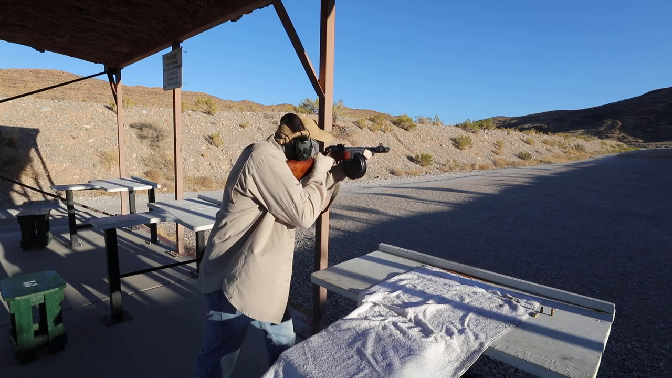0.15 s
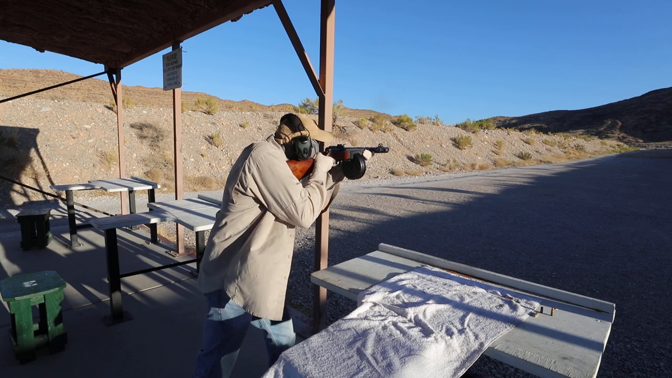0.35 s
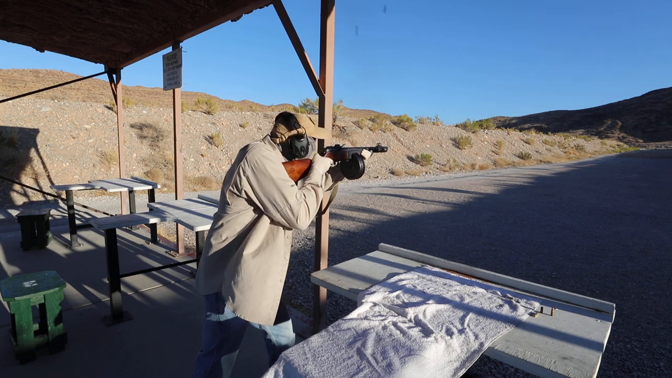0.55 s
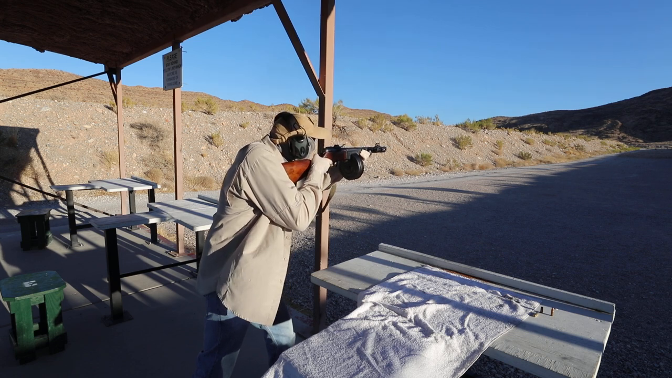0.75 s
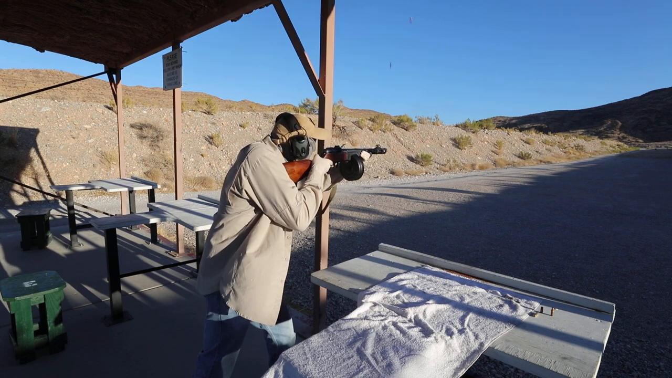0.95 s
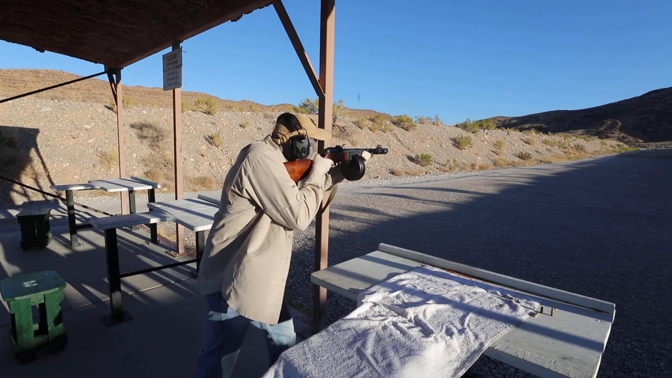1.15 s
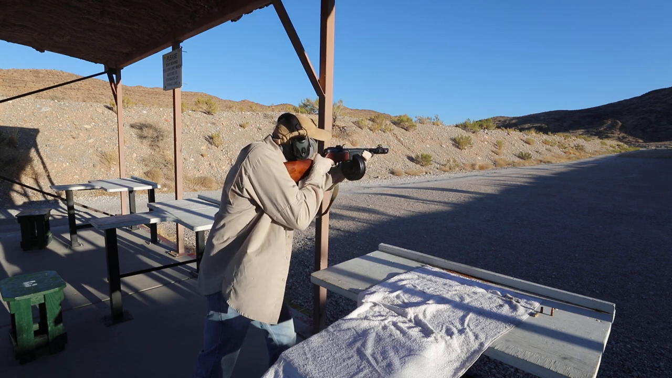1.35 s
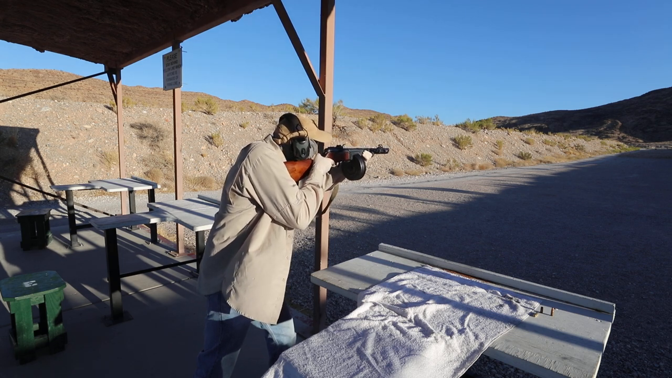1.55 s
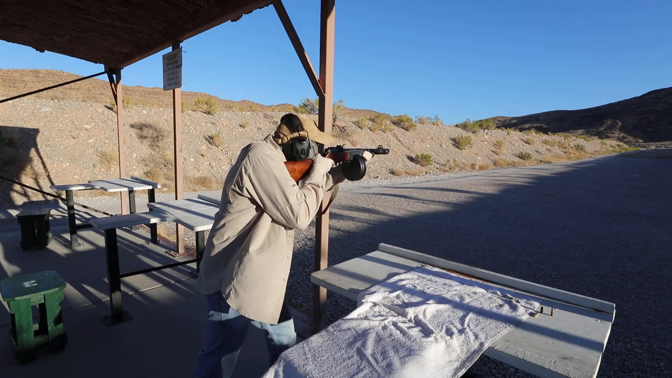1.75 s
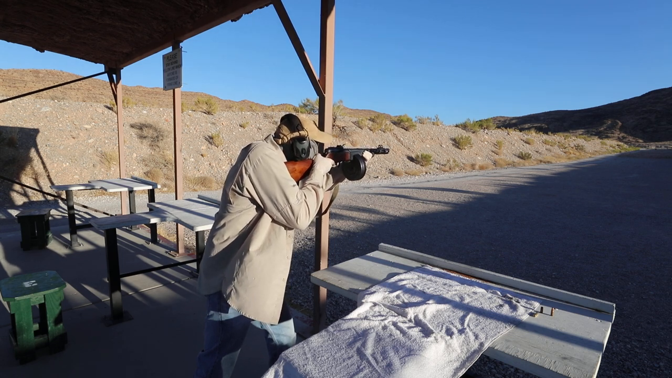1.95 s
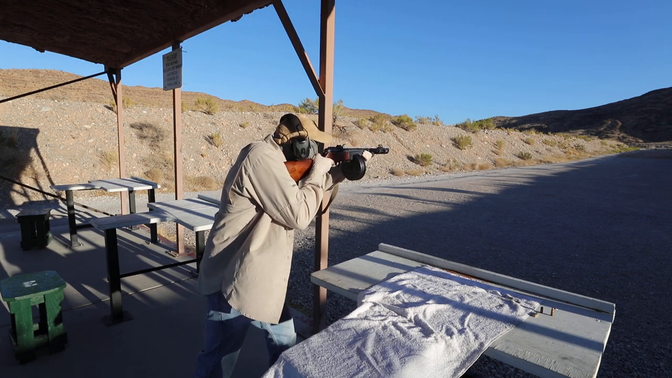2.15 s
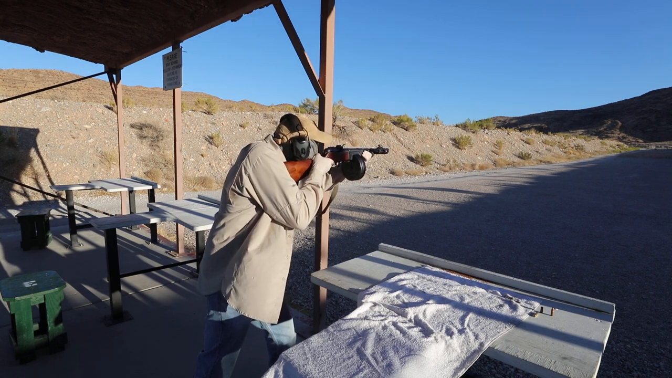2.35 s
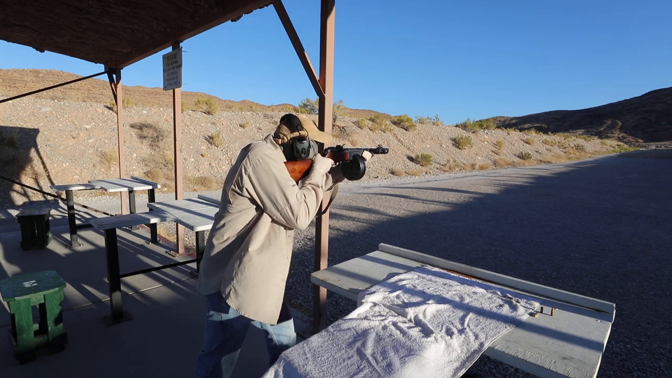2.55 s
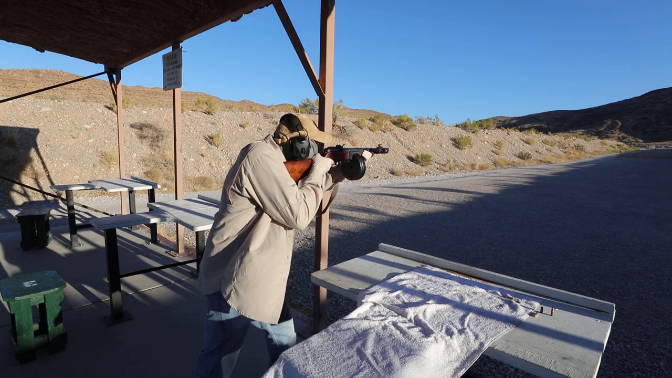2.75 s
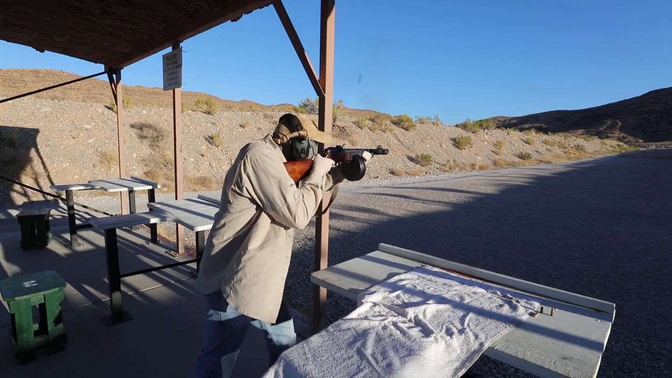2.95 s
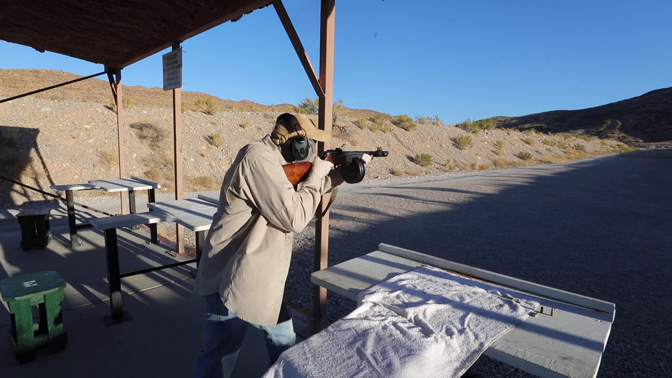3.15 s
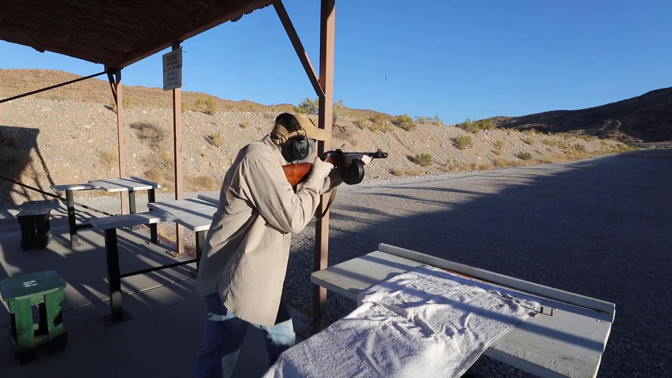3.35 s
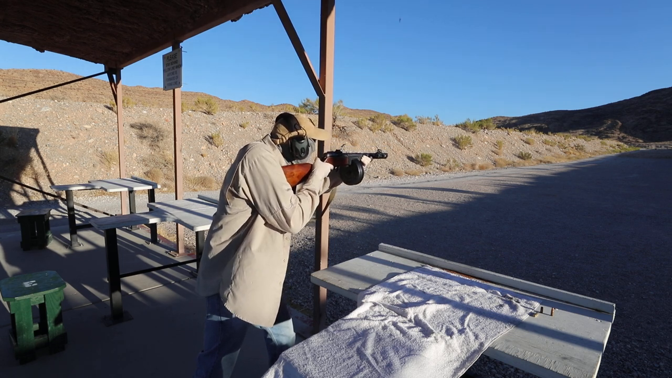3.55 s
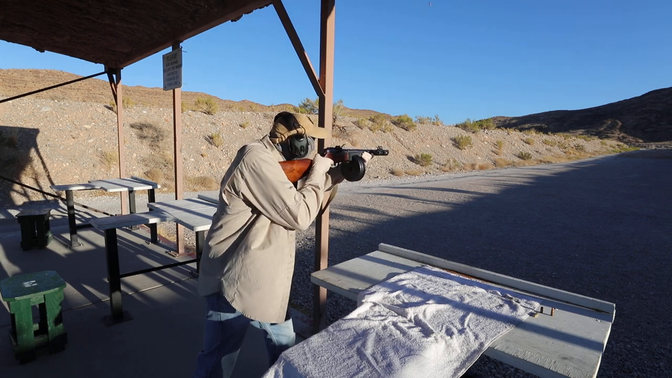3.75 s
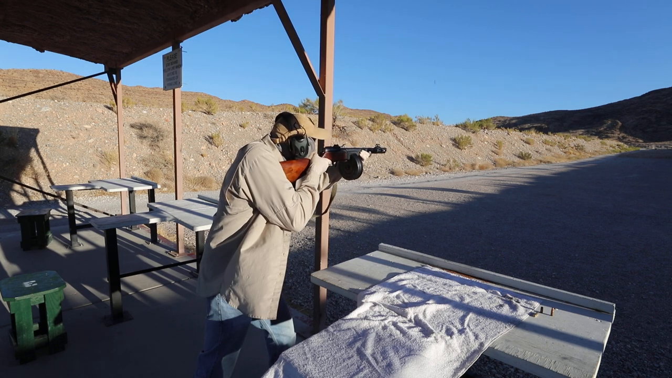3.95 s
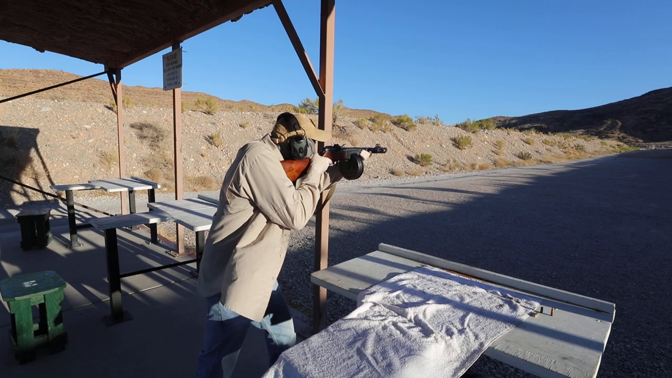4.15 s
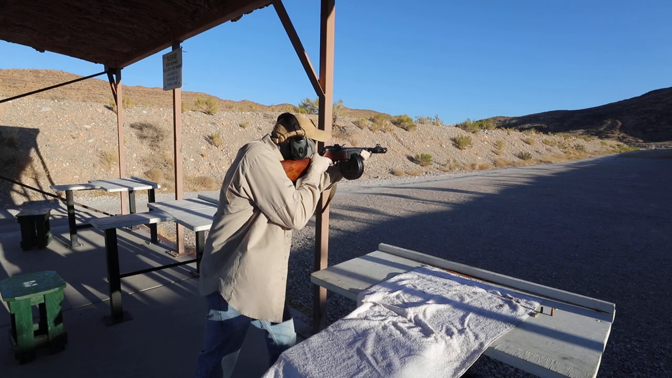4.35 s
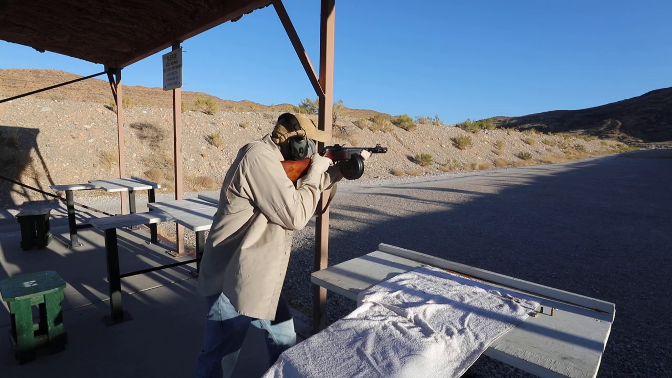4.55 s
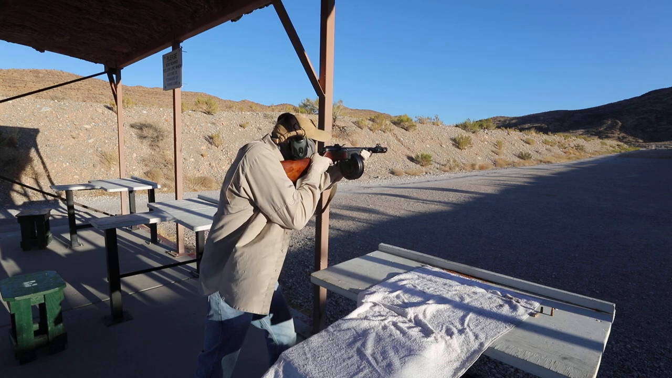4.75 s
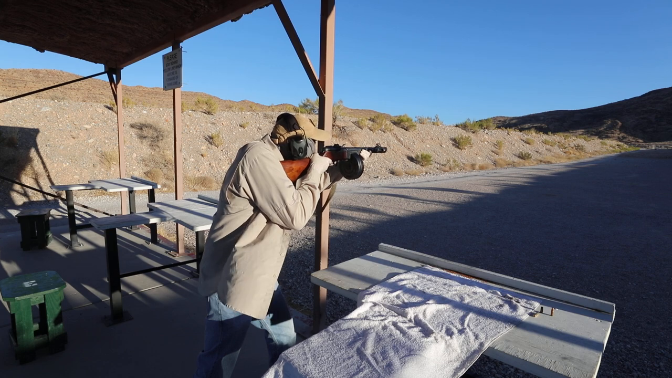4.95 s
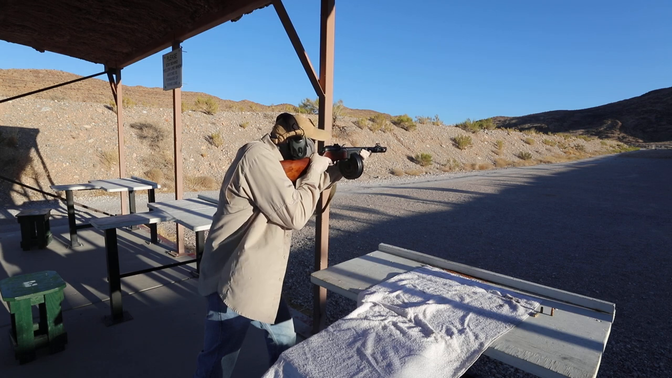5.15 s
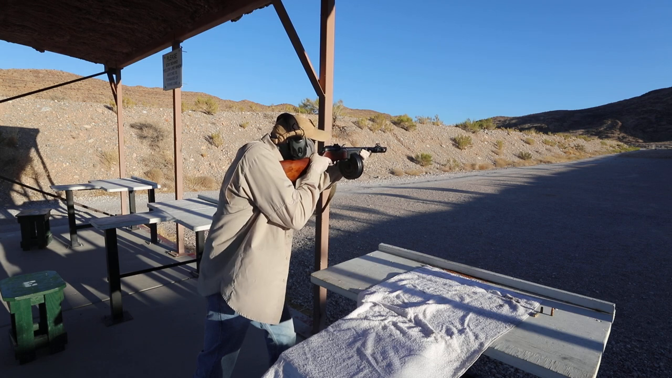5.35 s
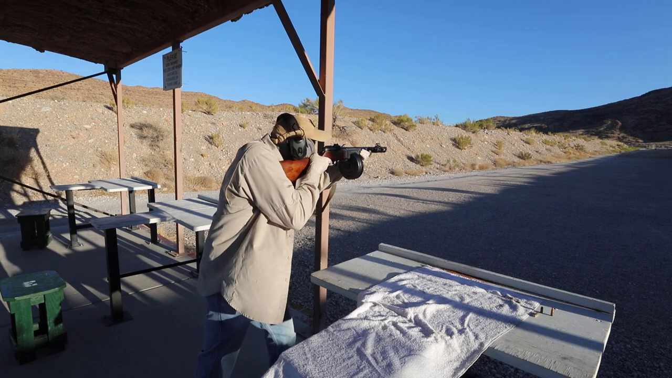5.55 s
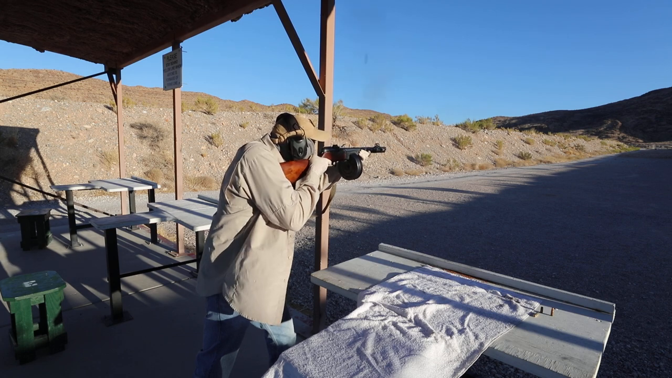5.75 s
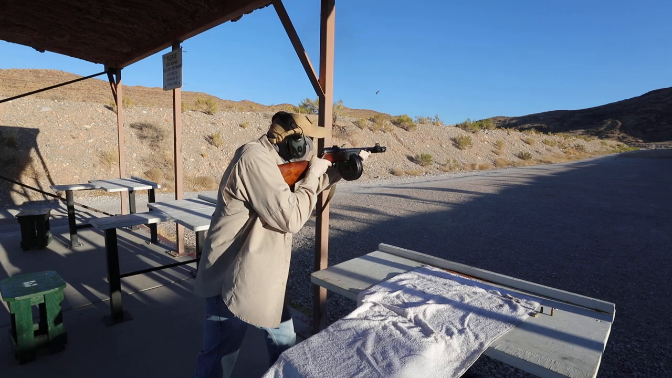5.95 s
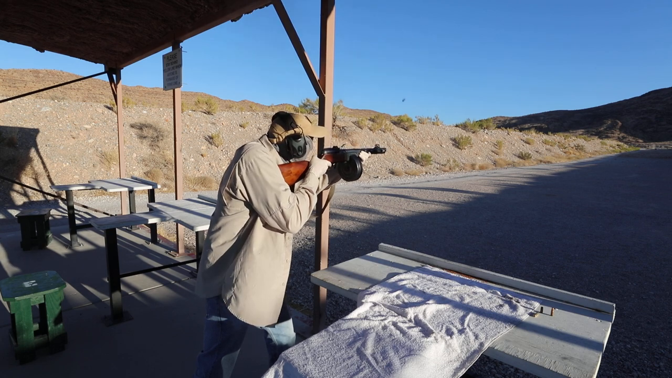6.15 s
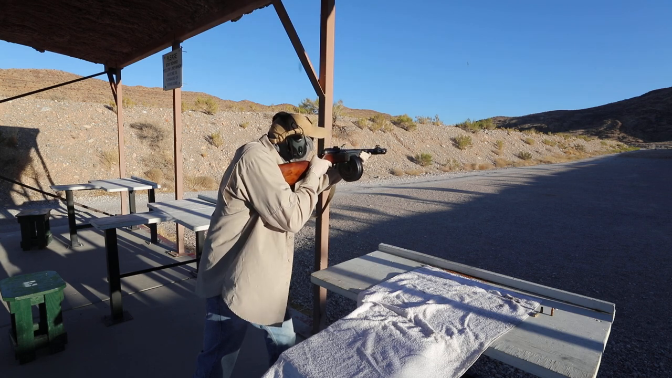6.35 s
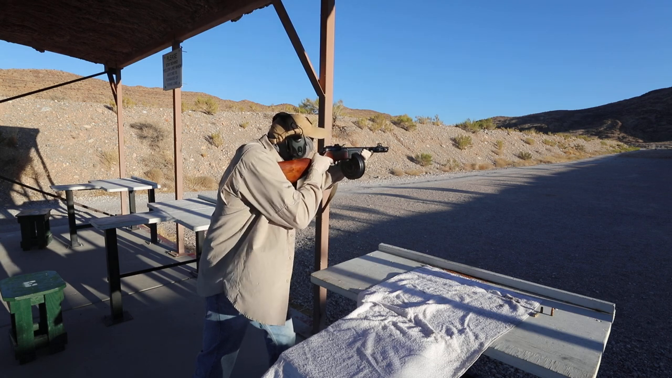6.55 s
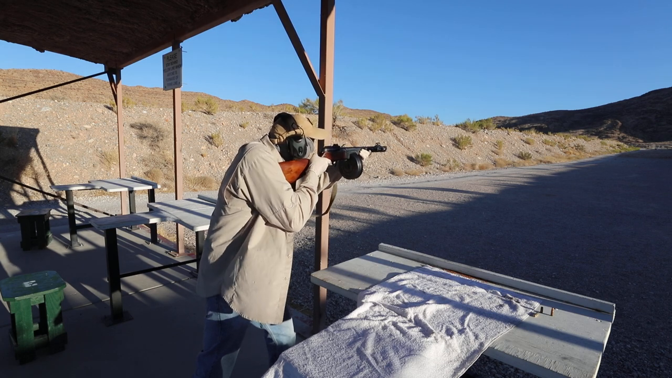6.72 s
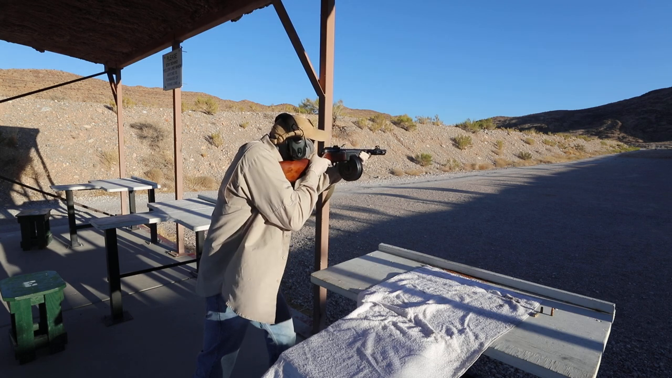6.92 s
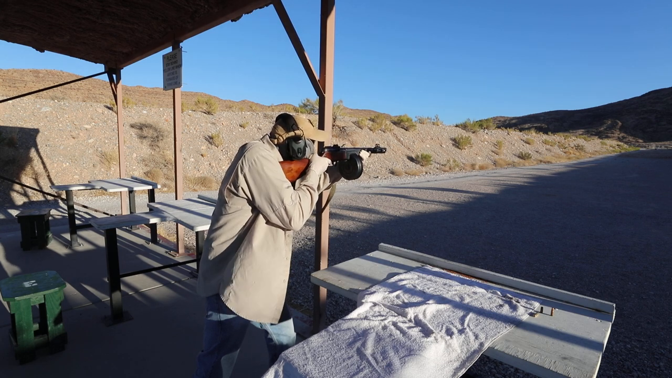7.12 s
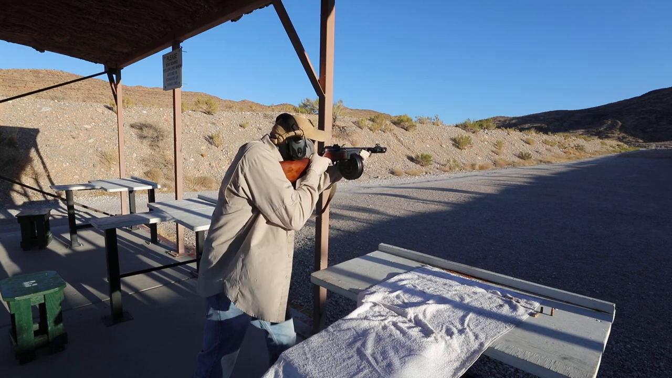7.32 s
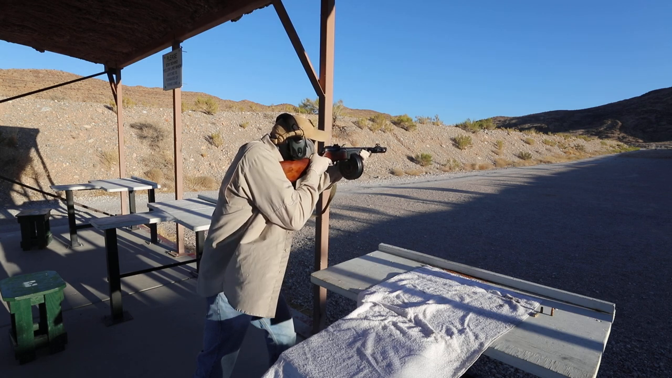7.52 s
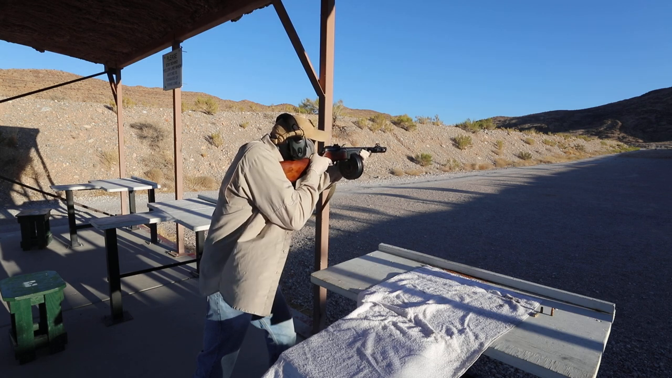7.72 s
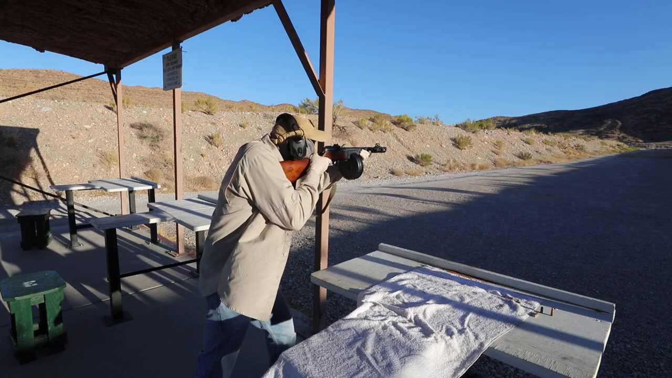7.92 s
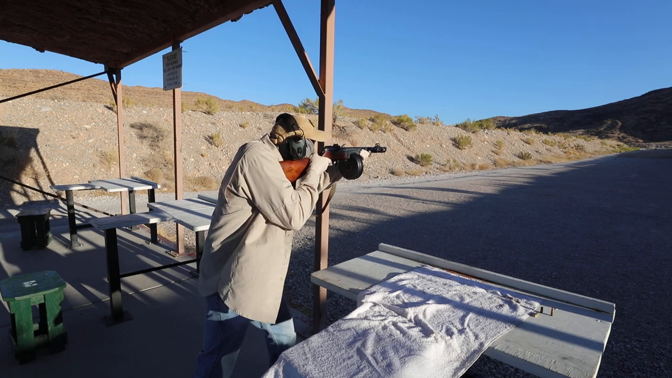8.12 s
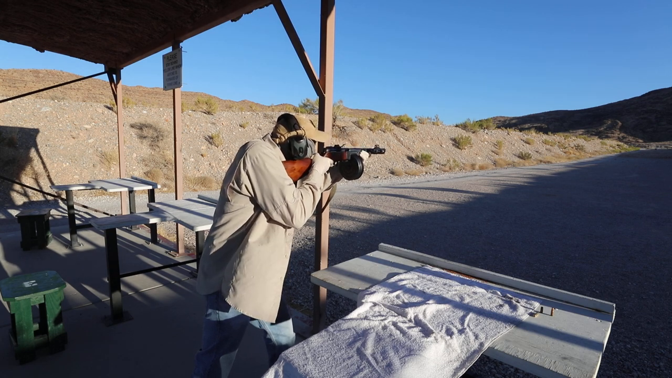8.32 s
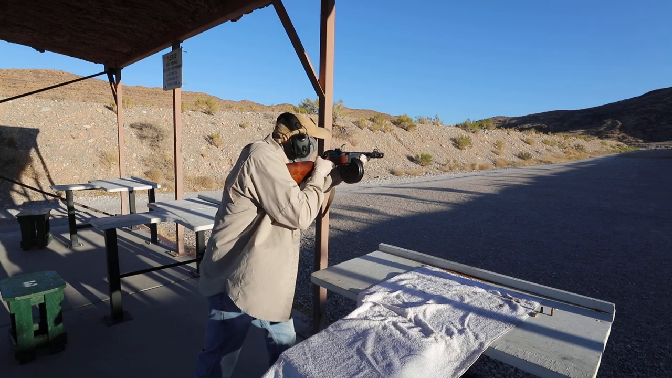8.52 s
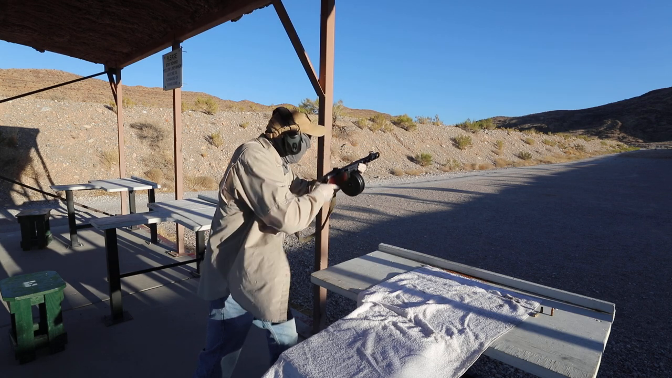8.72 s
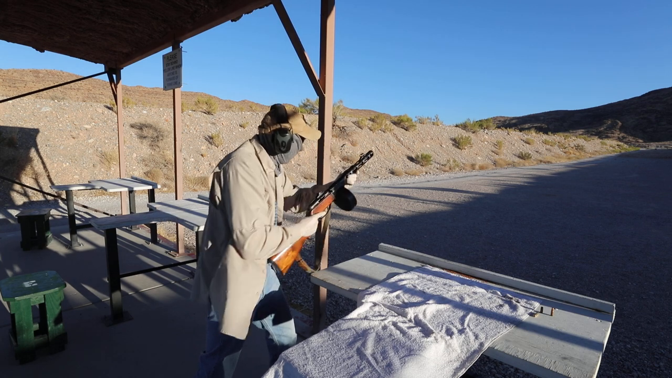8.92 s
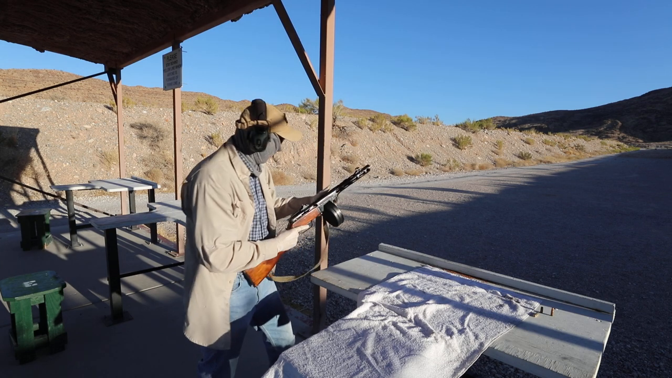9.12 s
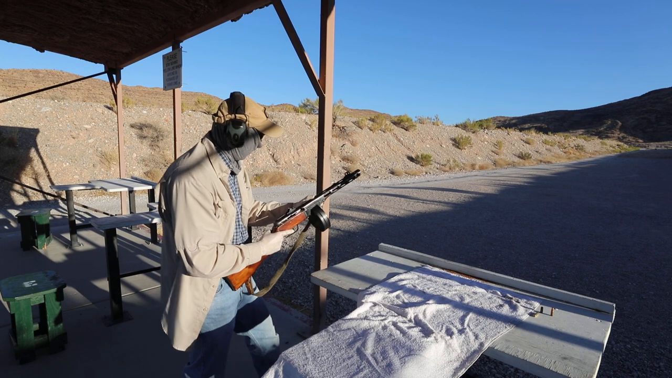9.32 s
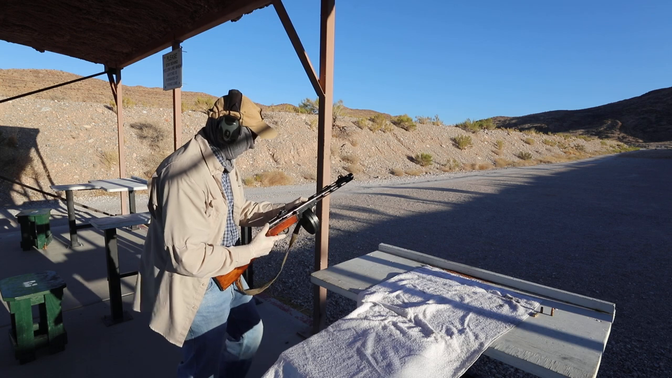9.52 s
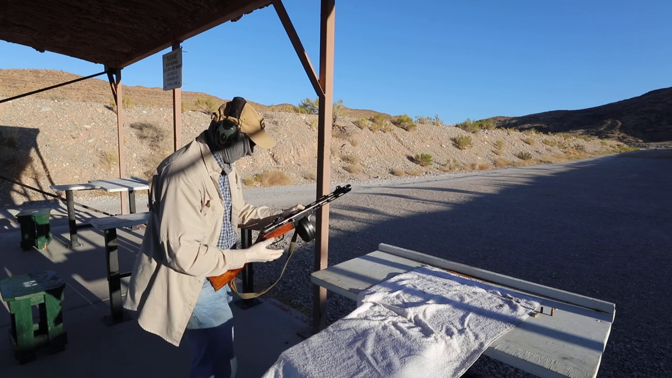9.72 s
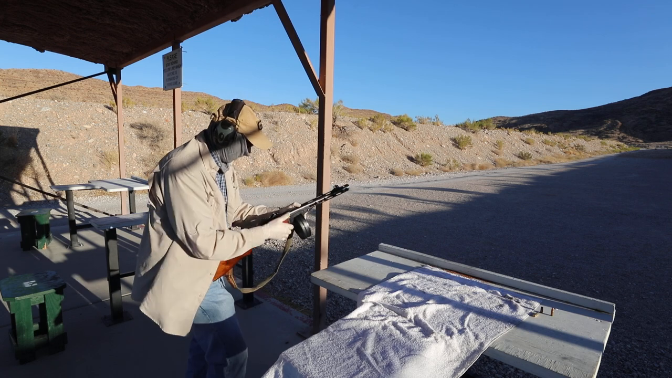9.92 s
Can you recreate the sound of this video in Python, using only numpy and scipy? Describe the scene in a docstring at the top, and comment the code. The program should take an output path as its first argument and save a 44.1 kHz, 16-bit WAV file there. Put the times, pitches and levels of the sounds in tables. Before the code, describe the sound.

A light breeze blows at an outdoor range. At about 0.3 seconds a trigger clicks, and a close submachine gun fires a loud, rapid three-round burst. Matching bursts follow at 3 and 5.8 seconds, each just after small mechanical clicks. The blasts overload the microphone, leave the steel shelter ringing and roll back from the hills for about two seconds; the background dips and recovers each time. Spent brass bounces on concrete with clacks and thin, high rings from roughly 1 to 2.8, 3.4 to 5.3 and 6.5 to 7.9 seconds. Occasional soft wind puffs bump the microphone. At 8.3 seconds the trigger clicks again and the bolt snaps shut on an empty chamber with one sharp steel clack. From 8.6 seconds until about 10, the gun is lowered with a faint scrape, light knocks and rustling cloth.

```python
"""A trigger clicks in a light breeze and a submachine gun barks under a steel range shelter: three bursts
of three, then the bolt snaps shut on an empty chamber and the gun is lowered with knocks and rustles.
Each blast fills the shelter and rolls back from the hills, and each burst leaves the steel frame ringing.
Spent brass bounces and sings on the concrete. The small microphone overloads on the shots;
its gain control ducks, then lets the breeze come back."""
import sys
import numpy as np
from scipy import signal
from scipy.io import wavfile
from scipy.ndimage import minimum_filter1d

SR = 44100
rng = np.random.default_rng(int(sys.argv[2]) if len(sys.argv) > 2 else 0)


def master(y):
    """Save y as 16-bit WAV."""
    cut = np.clip(np.atleast_2d(y).T, -1, 1)
    pcm = np.round(cut * 32767)  # scale
    wavfile.write(sys.argv[1], SR, pcm.astype(np.int16))


N = 440118

# Noise colours. Each row: frequency in Hz, relative level per Hz in dB.
BREEZE_COLOUR = [(12, -18), (25, -5), (50, -1.5), (100, -8), (160, -11.5), (250, -18), (500, -20),
                 (850, -22), (1400, -34.5), (2200, -36.5), (6000, -42.5), (15600, -42.5)]   # a low, airy bed
CLOTH_COLOUR = [(470, -34.5), (800, -10.5), (1520, -2), (2180, -3.5), (4270, -8), (5400, -10), (8980, -8),
                (15500, -20)]   # fabric rubbing
CONCRETE_COLOUR = [(800, -26), (1500, -6), (2500, -3), (4000, -11), (6000, -4), (11000, -4.5), (15500, -11)]   # the grit of brass hitting the slab
CLATTER_COLOUR = [(300, -18), (1000, -3), (2000, -0.5), (3000, 1.5), (4300, -7), (6000, -2.5),
                  (10000, -10.5), (15500, -9.5)]   # steel hitting steel
BLAST_COLOUR = [(30, -21.5), (120, -8), (245, -3.5), (330, -6), (600, -6), (800, 0.5), (1300, -6.5),
                (2100, -7), (3500, -18.5), (7000, -25), (15500, -29)]   # the shot under the roof
HILLS_COLOUR = [(60, -23), (125, -5), (200, -9.5), (400, -9), (800, -14), (1500, -3), (2200, -5),
                (3000, -10.5), (4300, -24), (6100, -12), (10000, -21), (15500, -31.5)]   # the shot coming back from the hills

# Air bumping the microphone. Each row: start in seconds, level in dB, pitch in Hz.
AIR_PUFFS = [(1.124, -24, 111), (1.403, -29, 177), (1.608, -18, 80), (1.686, -31, 76.5), (1.978, -25, 77),
             (2.296, -26.5, 76.3), (4.236, -28, 53.4), (7.086, -26.5, 146), (7.229, -29, 88.8),
             (7.9, -36.5, 105), (9.131, -31.5, 75.4), (9.19, -34, 64.6)]
# The fader ride of the cloth. Each row: time in seconds, level in dB.
RUSTLE_RIDE = [(8.55, -77), (8.8, -58), (9.05, -61), (9.25, -60), (9.45, -64), (9.62, -57), (9.7, -45),
               (9.77, -59), (9.98, -63)]
# Knocks on wood, sling and clothing. Each row: start in seconds, level in dB, body pitch in Hz,
# then the bright tick and the hollow part, both in dB against the body.
HANDLING_KNOCKS = [(2.6927, -26, 1250, -27, -4), (4.028, -32, 1320, -31, -18), (7.435, -30, 800, -22, 2),
                   (8.868, -44, 1310, -24, -5), (8.959, -42, 1100, -15, -0.5), (9.0915, -54, 4180, 8, -22),
                   (9.192, -34, 1470, -18, -11), (9.2177, -36, 2650, 1, -14), (9.2461, -41, 2820, -8, -7),
                   (9.2574, -32, 1560, -16, 3), (9.3326, -36, 1430, -23, -16),
                   (9.3574, -47, 1660, -4.5, -15), (9.4255, -42, 1180, -3, -18),
                   (9.5166, -48, 1680, -4, -12), (9.5837, -47, 4030, -2.5, -24),
                   (9.6641, -46, 3140, -16, -0.5), (9.6833, -46, 4240, -14, -14),
                   (9.7899, -47, 1510, -9, -16), (9.833, -54, 896, 6, -12)]

# Brass touching the slab. Each row: start in seconds, hit level in dB, clack pitch in Hz,
# clack in dB against the hit level, pitch of the case mouth in Hz, its own level in dB.
CASE_HITS = [(0.9498, -25, 2500, -8, 10500, -70), (1.4126, -21, 3960, -18.5, 9980, -43),
             (1.4792, -25, 3300, -9, 10500, -38), (1.4994, -34, 3450, -16, 10500, -40),
             (1.5367, -12, 3860, -11, 10770, -50), (1.5444, -29, 3870, -2, 10750, -33),
             (1.6494, -48, 3910, -11, 10750, -46), (1.7055, -50, 3390, -19, 10700, -49),
             (2.1111, -15, 3980, -17.5, 10800, -44.5), (2.4033, -32.5, 3430, -15, 10800, -50),
             (2.4126, -25, 3900, -18, 10800, -42), (2.562, -28, 3600, -17, 10840, -42),
             (2.6614, -34, 4170, -9.5, 10840, -54), (2.7462, -43, 4220, -16, 10750, -53),
             (2.7868, -39, 2780, -29, 10750, -55), (3.3897, -18.5, 2514, -12, 10920, -63),
             (3.49, -25, 2620, -11, 10920, -70), (3.8189, -18.5, 3705, -25, 10690, -40.5),
             (3.9599, -46, 2570, -12, 10650, -46.5), (3.9925, -35.5, 2423, -16, 10650, -49),
             (4.1238, -16, 3360, -7, 10930, -60), (4.3866, -31, 3700, -18, 11100, -52),
             (4.439, -17, 2550, -20, 10280, -43), (4.803, -34.5, 3440, -23, 10470, -51),
             (4.9571, -36, 3300, -4, 10400, -42.5), (5.0409, -45, 3440, -7, 10440, -53.5),
             (5.108, -44.5, 3560, -14, 10440, -60), (5.253, -46, 3700, -15, 10460, -58),
             (6.4977, -22.5, 2590, -7, 10750, -51), (6.788, -22.5, 3555, -12, 10610, -36.5),
             (6.8801, -16.5, 4050, -23, 10500, -33), (6.9344, -38, 2670, -26, 10400, -42),
             (6.9844, -34, 5234, -17.5, 10400, -46), (7.0414, -26.5, 2804, -20, 10550, -38.5),
             (7.0773, -39, 2980, -15, 10550, -41), (7.1482, -41.5, 2560, -22, 10550, -52),
             (7.4644, -24, 3600, -21, 10470, -36.5), (7.6914, -27, 3920, -12.5, 10600, -60),
             (7.8121, -35.5, 4000, -15.5, 10500, -48), (7.9085, -41.5, 3710, -22.5, 10500, -56)]
# Other wall modes that some touches wake. Each row: start in seconds, pitch in Hz, level in dB.
CASE_OVERTONES = [(1.414, 8940, -44), (1.413, 14010, -42), (1.546, 10600, -40), (1.57, 14030, -56),
                  (6.8, 13130, -40), (6.985, 13030, -55), (7.465, 10800, -42), (7.83, 10920, -52),
                  (6.935, 10150, -48), (6.985, 5080, -58)]

# Modes of the gun's receiver. Each row: pitch in Hz, relative level in dB, t60 in seconds.
RECEIVER_MODES = [(1900, -19, .03), (2900, -15, .03), (3400, -17, .04), (4300, -15, .03), (5900, -12, .09),
                  (9200, -20, .05)]
# Trigger pulls. Each row: first click, sear release and bolt home in seconds, trim of the bolt's run in dB.
TRIGGER_PULLS = [(.315, .356, .4062, -1), (2.889, 2.922, 2.9645, -1), (5.667, 5.704, 5.7525, 1),
                 (8.2255, 8.262, 8.2988, -4)]
# Contacts within a pull. Each row: stage (0 first click, 1 sear, 2 home), level in dB, relative scrape in dB.
PULL_CONTACTS = [(0, -23, -11), (.25, -26, -11), (.83, -24, -5), (1.0, -13, -8), (1.32, -11, -5),
                 (1.44, -12, -7), (1.6, -15, -5), (1.79, -9, -7), (1.95, -8, -7)]
# The bolt on the bare chamber, its bounce, the trigger let go.
# Each row: start in seconds, level in dB, t60 of the clatter in seconds, relative scrape in dB.
EMPTY_CONTACTS = [(8.2988, 22, .0055, -31), (8.304, -2, .03, -13), (8.447, -25, .06, -5)]

# Far ridges that swell the bass. Each row: delay in seconds, lift in dB, width in seconds.
RIDGE_SWELLS = [(.95, 8, .12), (1.17, 4, .07), (1.5, 5, .15)]
# Posts and beams. Each row: pitch in Hz, relative level in dB, t60 in seconds, seconds until choked.
FRAME_MODES = [(120, -34, 2.6, 0.72), (131, -39, 1.8, 0.28), (428, -26.5, 1.6, 0.5), (412, -29, 0.6, 0.57),
               (750, -53.5, 5.6, 1.79), (1303, -34.5, 3.0, 1.4), (1309, -41, 3.3, 1.5),
               (4030, -51.5, 2.1, 2.5)]
# The shelter's reverb. Each row: frequency in Hz, t60 in seconds.
SHELTER_DECAY = [(60, 0.1), (250, 0.33), (1000, 0.21), (4000, 0.26), (12000, 0.22)]
# First arrivals of a round, straight and off roof, bench and slab.
# Each row: delay in seconds, crack level in dB, signed height of the pressure push, its length in seconds.
FIRST_ARRIVALS = [(0, 4, 2, 0.00093), (.005, 3, -3, 0.0012), (.0095, -5.5, 2.5, .001),
                  (0.0127, -3, -2.5, .0016)]
# The rounds, three to a burst. Each row: start in seconds, blast level in dB.
ROUNDS = [(.4062, 17.5), (0.4588, 14.5), (0.5254, 18), (2.9645, 17.5), (3.0157, 17), (3.0693, 18),
          (5.7525, 19), (5.8027, 14), (5.8589, 17)]


def amp(db):
    """dB to gain."""
    return 10 ** (np.asarray(db) / 20)


def rms_one(x):
    """Scale to rms 1."""
    return x / np.sqrt(np.mean(x ** 2) + 1e-20)


def at_hz(points, hz):
    """Read a table on a log-frequency axis."""
    freqs, values = np.transpose(points)
    return np.interp(np.log(hz), np.log(freqs), values)


def smooth(x, seconds):
    """One-pole low-pass."""
    pole = np.exp(-1 / (seconds * SR))
    return signal.lfilter([1 - pole], [1, -pole], x)


def fade(t, t60):
    """A tail that falls 60 dB in t60 seconds."""
    return amp(-60 * t / t60)


def choke(t, after_s, over_s):
    """A gate: open until after_s, then shut over over_s."""
    return np.clip((after_s - t) / over_s + 1, 0, 1)


def bandpass(x, low, high):
    """Keep what lies between low and high Hz."""
    return signal.sosfilt(signal.butter(2, [low, high], "band", fs=SR, output="sos"), x)


def narrow(white, hz, spread):
    """Pitched noise between hz / spread and hz * spread, rms 1."""
    return rms_one(bandpass(white, hz / spread, hz * spread))


def bands(size):
    """White noise in half octaves: yields centre Hz and band."""
    edges = 20 * 2 ** np.arange(0, 10, .5)
    white = rng.standard_normal((2, size))
    for k, (low, high) in enumerate(zip(edges, edges[1:])):
        yield np.sqrt(low * high), bandpass(white[k % 2], low, high)


def noise(colour, gusts_db=0):
    """A full-length bed of coloured noise, rms 1; gusts make the bands under 300 Hz wander."""
    out, knots = 0, np.arange(0, N + 4000, 4000)
    for hz, band in bands(N):
        level_db = at_hz(colour, hz) + gusts_db * (hz < 300) * rng.standard_normal(len(knots))
        out = out + np.interp(np.arange(N), knots, amp(level_db)) * band
    return rms_one(out)


def add(out, start, piece):
    """Mix a piece in at start seconds."""
    i = round(start * SR)
    out[i:i + len(piece)] += piece[:N - i]


def breeze():
    """Moving air: a quiet bed with a gently gusting low end."""
    return amp(-46.8) * noise(BREEZE_COLOUR, gusts_db=1.5)


def puffs(rise_s=.017):
    """Air bumps the microphone: a few cycles of low noise swell and die."""
    out, t = np.zeros(N), np.arange(SR // 3) / SR
    swell = t / rise_s * np.exp(-t / rise_s)
    for start, db, hz in AIR_PUFFS:
        add(out, start, amp(db) * swell * narrow(rng.standard_normal(len(t)), hz, 1.48))
    return out


def rustle(grains_per_s=900):
    """Cloth rubs in clumps of tiny grains."""
    times, db = np.transpose(RUSTLE_RIDE)
    ride = amp(np.interp(np.arange(N) / SR, times, db, left=-120))
    sizes = amp(4.2 * rng.exponential(1, N))
    grains = smooth(sizes * (rng.random(N) < grains_per_s / SR), .001)
    return ride * rms_one(noise(CLOTH_COLOUR) * (.52 + rms_one(grains)))


def knocks():
    """Handling bumps: a dull body, a hollow part below, a bright tick on top."""
    out, t = np.zeros(N), np.arange(SR // 4) / SR
    # faint taps at random while the gun is lowered
    fidgets = [(8.75 + 1.2 * when, -61 + 6 * size, 900 * 4 ** pitch, 0, -12)
               for when, size, pitch in rng.random((10, 3))]
    for start, db, hz, tick_db, hollow_db in HANDLING_KNOCKS + fidgets:
        white = rng.standard_normal((3, len(t)))
        t60 = max(.075 + .005 * (db + 40), .03)   # harder knocks ring longer
        body = narrow(white[0], hz, 1.33) + amp(hollow_db) * narrow(white[1], 450, 1.3)
        tick = amp(tick_db) * narrow(white[2], 8800, 1.55) * (fade(t, .02) + amp(-7.5) * fade(t, .22))
        add(out, start, amp(db) * (body * fade(t, t60) + tick))
    return out


def slide(start=8.62, length_s=.11):
    """One soft scrape: an arch of narrow midrange noise."""
    out, t = np.zeros(N), np.arange(SR // 4) / SR
    arch = np.sin(np.pi * np.minimum(t / length_s, 1)) ** .5
    add(out, start, amp(-58) * arch * narrow(rng.standard_normal(len(t)), hz=1400, spread=1.12))
    return out


def case_clacks():
    """Brass hits the slab: a gritty crack and a pitched clack."""
    out, t = np.zeros(N), np.arange(SR // 3) / SR
    grit = noise(CONCRETE_COLOUR)
    for start, db, hz, clack_db, *_ in CASE_HITS:
        i = round(start * SR)
        crack = grit[i:i + len(t)] * (fade(t, .0085) + amp(-9.5) * fade(t, .21))   # contact, then shelter
        clack = fade(t, .13) * narrow(rng.standard_normal(len(t)), hz, 1.11)
        add(out, start, amp(db) * (amp(-9) * crack + amp(clack_db) * clack))
    return out


def case_song(longest_s=.19, overtone_s=.065, tumble_depth=.65):
    """A tumbling case sings in two close, beating modes until the next touch or until it lies still."""
    out, t = np.zeros(N), np.arange(SR // 3) / SR
    gaps = np.diff([hit[0] for hit in CASE_HITS], append=N / SR)
    rings = [(start, hz, db, min(gap, longest_s)) for (start, *_, hz, db), gap in zip(CASE_HITS, gaps)]
    rings += [(*overtone, overtone_s) for overtone in CASE_OVERTONES]
    for start, hz, db, lasts in rings:
        detune = rng.uniform(.0011, .004)
        pair = np.sin(2 * np.pi * hz * t) + 1.2 * np.sin(2 * np.pi * hz * (1 + detune) * t)
        add(out, start, amp(db) * fade(t, t60=.38) * choke(t, lasts - .02, .04) * pair)
    tumble = rms_one(smooth(smooth(rng.standard_normal(N), .003), .003))
    return out * (1 + tumble_depth * tumble)


def trigger_and_bolt(contact_t60=.036):
    """Steel on steel: a snap of clatter, the ring of the receiver, the scrape of the sliding bolt."""
    out, t = np.zeros(N), np.arange(SR // 4) / SR
    clatter = noise(CLATTER_COLOUR)
    pulls = [(np.interp(stage, [0, 1, 2], times), db + run_db * (stage > 1), contact_t60, scrape_db)
             for *times, run_db in TRIGGER_PULLS for stage, db, scrape_db in PULL_CONTACTS]
    for start, db, t60, scrape_db in EMPTY_CONTACTS + pulls:
        ring = sum(amp(mode_db + rng.normal(0, 4)) * fade(t, mode_t60) * np.sin(2 * np.pi * hz * t)
                   for hz, mode_db, mode_t60 in RECEIVER_MODES)
        i = round(start * SR)
        snap = clatter[i:i + len(t)] * (fade(t, t60) + amp(scrape_db) * fade(t, .23))
        add(out, start, amp(db) * (amp(-12.5) * snap + amp(-3.5) * fade(t, 3 * t60) * ring))
    return out


def hill_echo(t, noise_bands, slope_end_s=1.15):
    """The long tail: bass rolls down the valley, treble comes off the near slope until it ends."""
    ridges_db = sum(db * np.exp(-((t - delay) / width) ** 2) for delay, db, width in RIDGE_SWELLS)
    bass_db = -7 - 15 * t + ridges_db
    out = 0
    for hz, band in noise_bands:
        hurried = t * max(hz / 1700, 1) ** .52   # far slopes return duller: the treble runs out first
        treble_db = -6.5 - 19 * hurried - 100 * np.maximum(hurried - slope_end_s, 0)
        treble_share = np.clip(np.log2(hz / 700) / 1.6, 0, 1)
        roll_db = (1 - treble_share) * bass_db + treble_share * treble_db
        air_loss_db = 18 * (hz / 8000) ** .62 * t
        out = out + amp(at_hz(HILLS_COLOUR, hz) + roll_db - air_loss_db) * band
    return out


def frame_ring(t):
    """Steel posts and beams hum after a blast, each mode choked in its turn."""
    return sum(amp(db) * fade(t, t60) * choke(t, lasts, .17) * np.sin(2 * np.pi * hz * t)
               for hz, db, t60, lasts in FRAME_MODES)


def blast(t, noise_bands):
    """The close punch: cracks and pressure jumps over the shelter's short reverb."""
    reverb = sum(amp(at_hz(BLAST_COLOUR, hz)) * fade(t, at_hz(SHELTER_DECAY, hz)) * band
                 for hz, band in noise_bands)
    out = reverb / np.std(reverb[:SR // 50]) * (1 - np.exp(-t / .001))   # the shelter fills in a few ms
    hiss = rng.standard_normal(len(t))
    for delay, crack_db, push, length in FIRST_ARRIVALS:
        age = np.maximum(t - delay, 0)
        crack = amp(crack_db) * fade(age, .014) * hiss
        pressure = push * (1 - age / length) * np.exp(-age / length)
        out += (t >= delay) * (crack + pressure)
    return out


def gunfire():
    """Every round plays the same blast and echo; the frame rings on from the last round of a burst."""
    out, t = np.zeros(N), np.arange(int(2.5 * SR)) / SR
    noise_bands = list(bands(len(t)))
    shot = blast(t, noise_bands) + amp(-18.5) * hill_echo(t, noise_bands)
    for start, db in ROUNDS:
        add(out, start, amp(db) * shot)
    for start, _ in ROUNDS[2::3]:
        add(out, start, amp(8.5) * frame_ring(t))
    return out


def scene():
    """The mono mix: gun, brass and handling over the breeze."""
    mix = breeze() + gunfire() + trigger_and_bolt() + case_clacks() + case_song()
    return (mix + knocks() + slide() + rustle() + puffs())[None]


def duck(x, window_s, threshold_db, share, hold_s, release_db_per_s, attack_s):
    """Gain control: turns down by a share of the level over threshold, holds, then recovers steadily."""
    over_db = np.maximum(10 * np.log10(smooth(x ** 2, window_s) + 1e-12) - threshold_db, 0)
    half_hold = int(hold_s * SR / 2)
    held_db = -minimum_filter1d(-over_db, size=2 * half_hold + 1, origin=half_hold)
    ramp = release_db_per_s / share * np.arange(N) / SR
    released_db = np.maximum.accumulate(held_db + ramp) - ramp
    return amp(-share * smooth(released_db, attack_s))


def record(dry, cutoff_hz=15720):
    """Crunch and pump: a slow input gain, a converter that overloads, a quick limiter, a band limit."""
    gain = duck(np.clip(dry[0], -1, 1), window_s=.037, threshold_db=-18, share=.87,
                hold_s=.13, release_db_per_s=17.5, attack_s=.052)
    x = np.clip(dry[0] * gain, -1, 1)
    x = signal.sosfilt(signal.butter(1, 100, "high", fs=SR, output="sos"), x)   # coupling: flat tops sag
    limiter = duck(x, window_s=.0015, threshold_db=-12.5, share=.9,
                   hold_s=.065, release_db_per_s=29, attack_s=.00083)
    late_limiter = np.interp(np.arange(N) - .0055 * SR, np.arange(N), limiter)
    x = np.clip(x * late_limiter, -.94, .94)
    return signal.sosfilt(signal.ellip(10, .3, 70, cutoff_hz, fs=SR, output="sos"), x)[None]


dry = scene()
out = record(dry)
master(out)
```